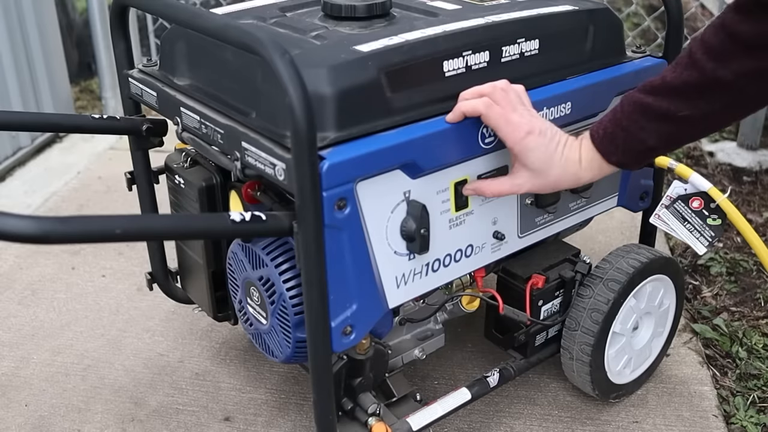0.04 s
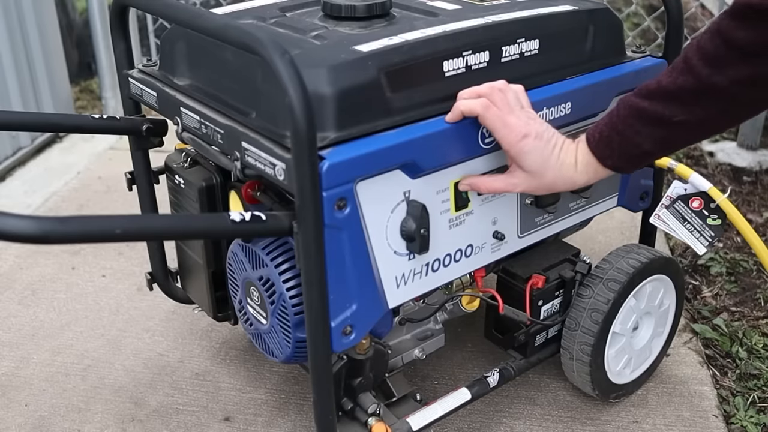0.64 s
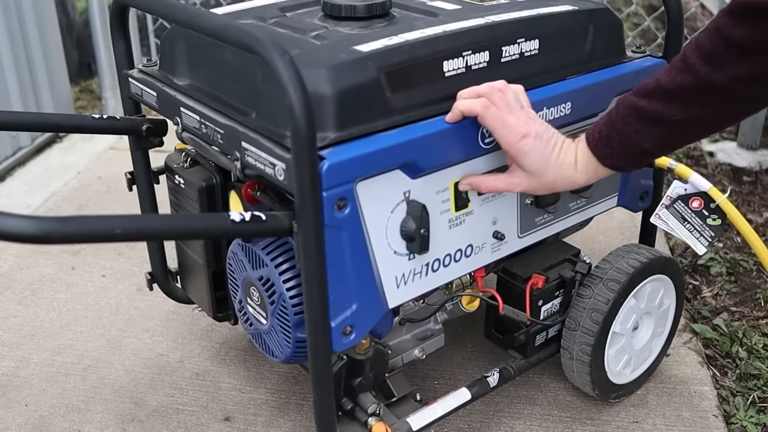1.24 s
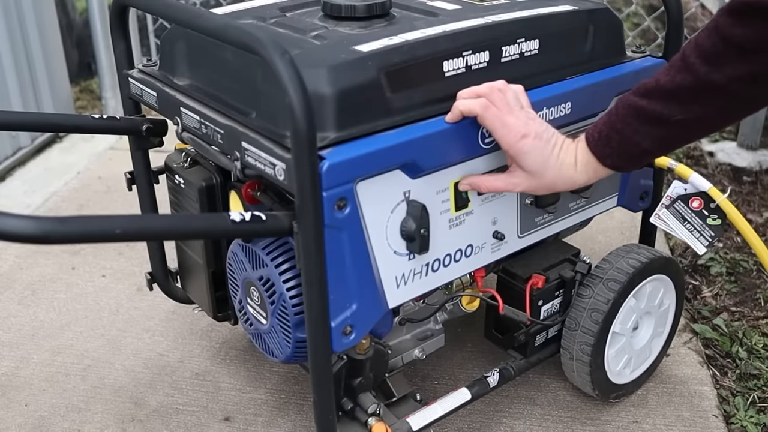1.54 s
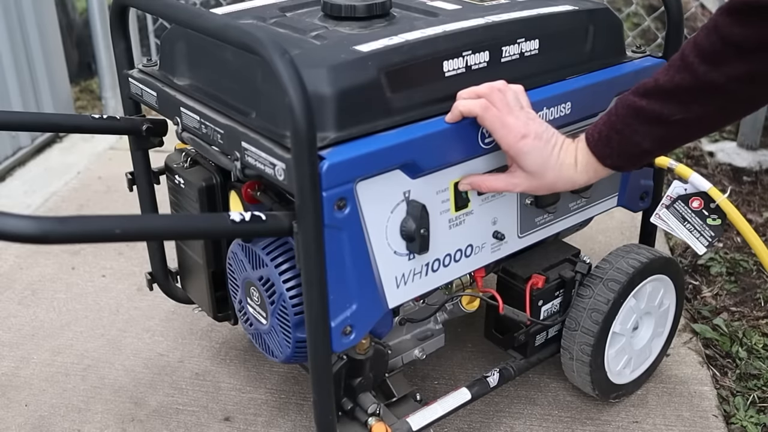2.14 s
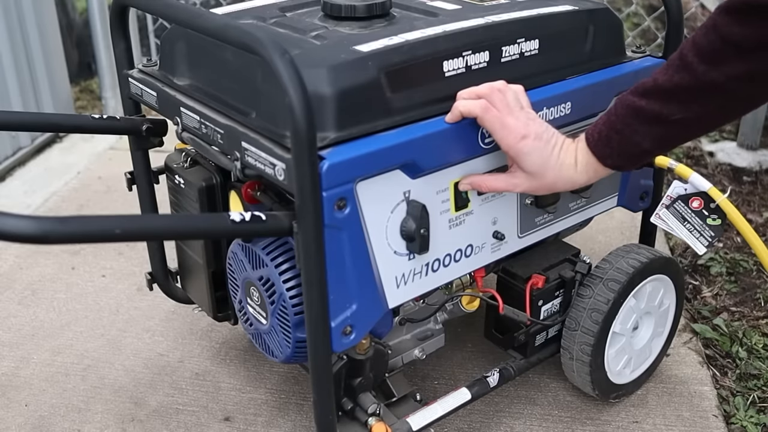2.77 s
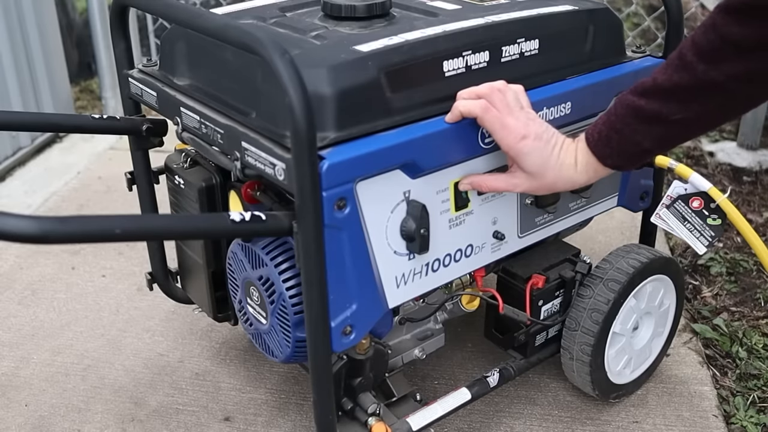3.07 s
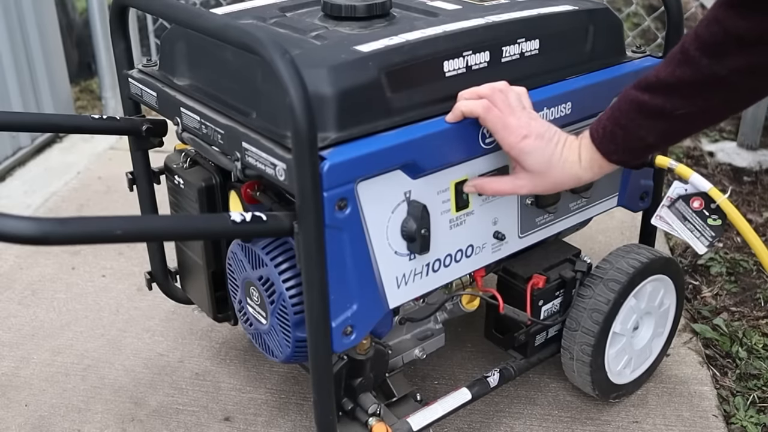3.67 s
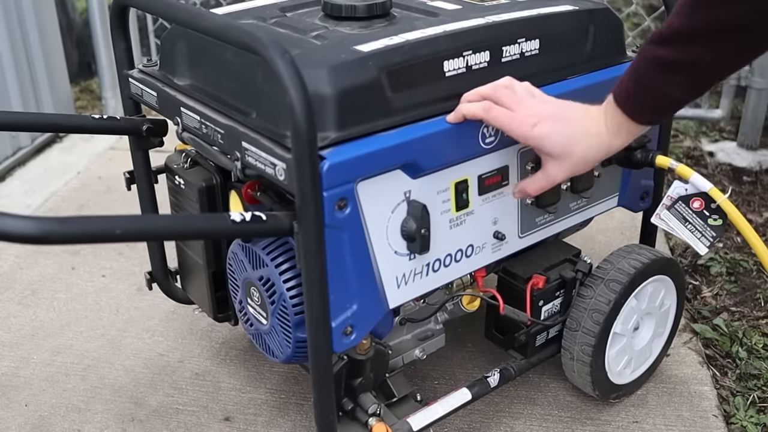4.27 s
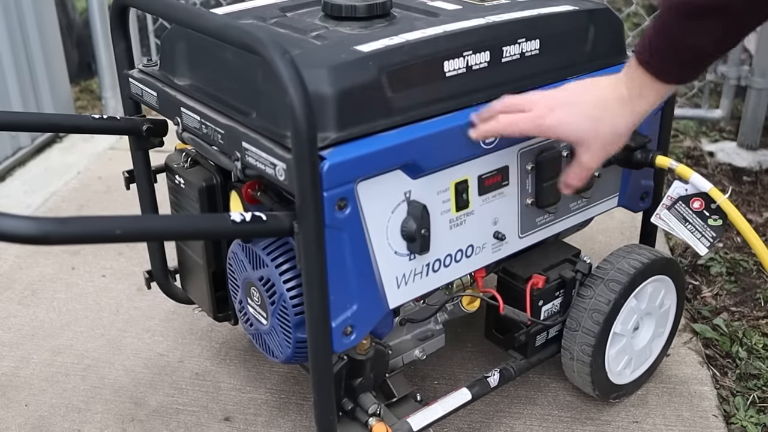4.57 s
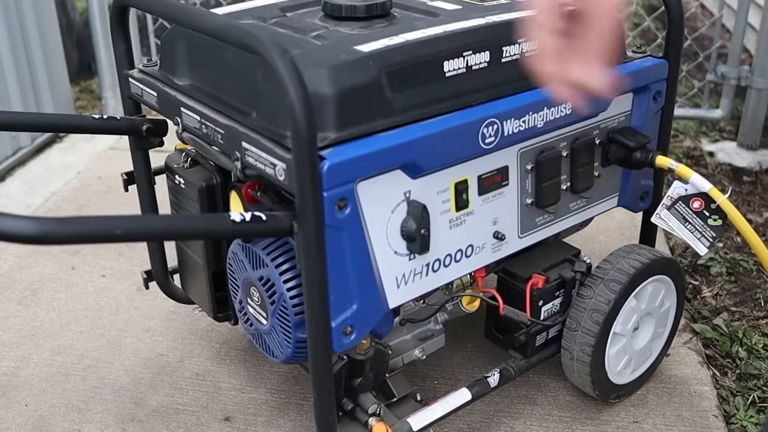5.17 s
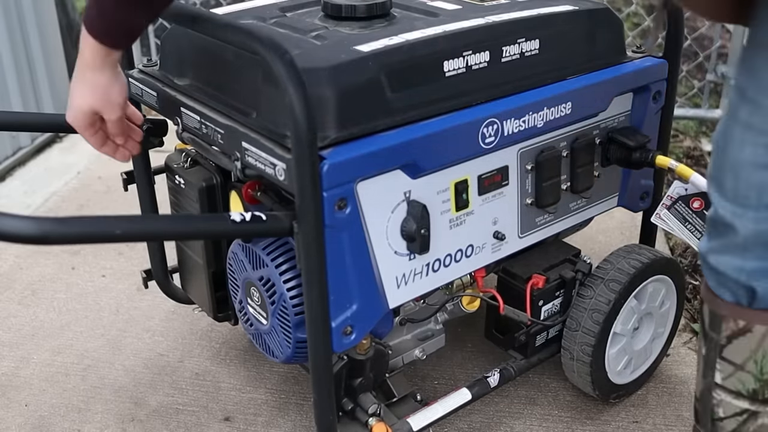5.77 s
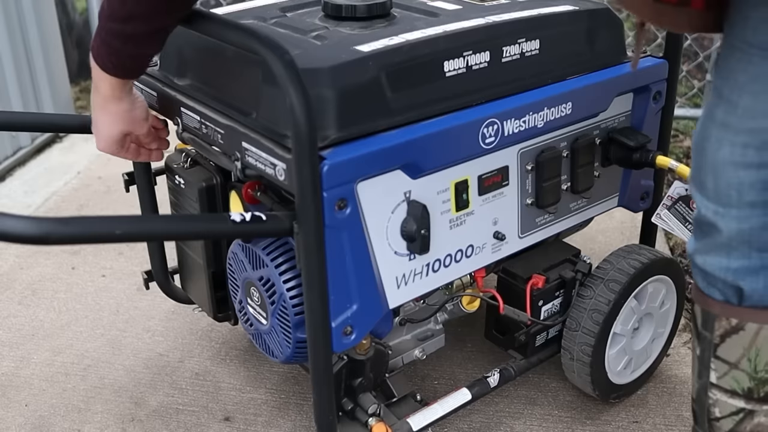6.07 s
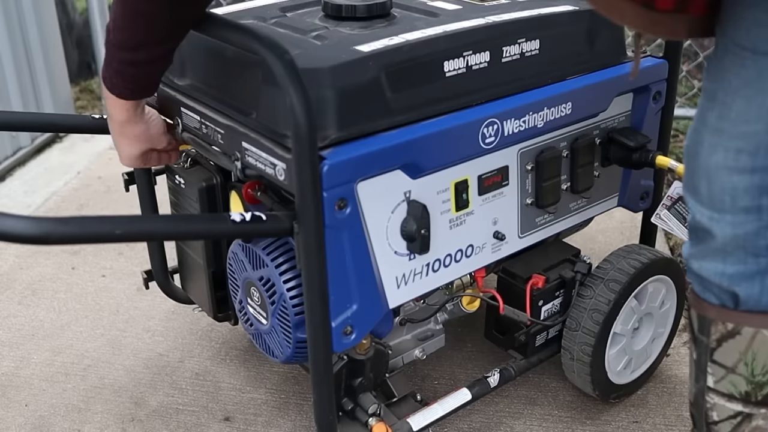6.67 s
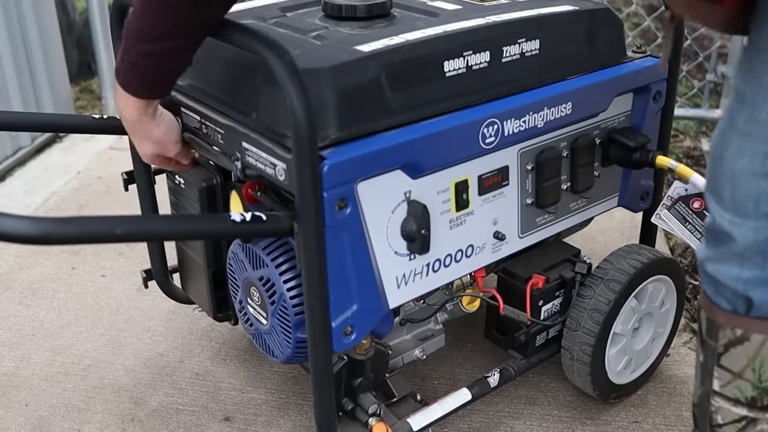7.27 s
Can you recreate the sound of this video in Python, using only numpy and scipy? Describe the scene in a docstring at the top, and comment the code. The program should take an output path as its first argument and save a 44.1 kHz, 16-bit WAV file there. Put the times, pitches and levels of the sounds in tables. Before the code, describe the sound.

A small petrol generator starts up outdoors over very faint background air. A rocker switch clicks lightly at about 0.1 seconds, and at 0.35 seconds the electric starter engages with a sharp metallic clack and a shudder of the frame. From 0.5 seconds the starter cranks with ringing, grinding gears and a wavering motor whine, falling into even surges about four times a second. At about 3.1 seconds it drops out and the engine catches with a few irregular cracks. From 3.6 seconds the engine races up, with exhaust pulses, rattling knocks and hiss, peaking near 4.4 seconds. The speed dips briefly, then settles by 5 seconds into a steady, throbbing drone with mechanical clatter. Around 6.7 seconds the tone becomes a little less boomy and a light whine joins in. The engine is still running at the end, a little after 7 seconds.

```python
"""Petrol generator starting outdoors.

A switch clicks, the starter pinion slams in and its gears grind one cylinder over each compression.
The engine catches with a few cracks, races up and settles at governed speed: two gas pulses a cycle
ring the pipes, knocks rattle the block, the exhaust valve hisses. Faint air lies behind."""
import sys
import numpy as np
from scipy import signal
from scipy.fft import rfft, irfft
from scipy.io import wavfile
from scipy.ndimage import uniform_filter1d

SR = 44100
rng = np.random.default_rng(int(sys.argv[2]) if len(sys.argv) > 2 else 0)


def master_out(mix):
    """Clip the mix to full scale and print it as 16-bit PCM to the path in sys.argv[1]."""
    frames = np.transpose(np.atleast_2d(mix))
    ceiling = np.clip(frames, -1, 1)
    pcm = np.round(ceiling * 32767).astype(np.int16)
    wavfile.write(sys.argv[1], SR, pcm)


N = 322812
TIME_S = np.arange(N) / SR
FREQ_HZ = np.maximum(np.arange(N // 2 + 1) * SR / N, 1)

# engine speed, two shaft turns a cycle: t/s, cycle rate/Hz
ENGINE_SPEED = [(3.1, 6.2), (3.3, 8.7), (3.55, 9.16), (3.7, 15.9), (3.79, 18.9), (3.86, 21.2), (4.0, 24.9),
                (4.2, 29.3), (4.39, 31.7), (4.7, 29.7), (5.0, 31.0), (5.4, 30.5), (5.92, 30.8),
                (6.68, 30.5), (7.05, 31.9), (7.32, 31.4)]
# throttle shuts on the overshoot, hunts, eases as the choke opens: t/s, opening/1
THROTTLE_TRAVEL = [(4.34, 0.96), (4.46, .04), (4.6, 0.24), (4.76, 0.6), (5.03, 0.34), (5.6, 0.51),
                   (6.84, 0.63), (7.06, 0.24)]
# valve, piston and gear knocks: phase/cycles, level/dB
KNOCKS = [(0.051, -9), (0.191, -4), (.3, -5), (0.431, -1), (.55, -5.5), (.67, -7), (.8, -1), (0.923, -6)]
# whine with the choke open: f/cycle rate, level/dB
WHINE_ORDERS = [(14, -15), (36, -11.5), (40, -10.5)]
# gear mesh: phase past compression/cycles, tooth rate/Hz
MESH_RATE = [(-.5, 880), (-.25, 810), (-.05, 715), (.15, 670), (.3, 640), (.42, 850)]
# pinion slamming in; pinion dropping out and first firings: t/s, level/dB, t60/s, tilt/(dB/octave)
PINION_BLOWS = [(.342, -31, 0.077, 8), (.351, -10.5, 0.1, 3.5), (.357, -8, 0.064, 5.5),
                (.364, -1, 0.095, 3), (.369, -11, 0.073, 4), (.380, -22.5, 1, -2.5)]
CATCH_BLOWS = [(3.203, -19, 0.078, 1), (3.385, -20, 0.21, 5), (3.505, -20.5, 0.45, 6),
               (3.604, -11, 0.15, -0.5), (3.62, -15.5, 0.22, 6.5), (3.676, -17, 0.2, -2),
               (3.693, -17.5, 0.092, 8), (3.745, -14, 0.14, 3)]
# frame jolts as the pinion hits and takes load: t/s, level/dB, attack/s, decay/s
FRAME_JOLTS = [(.37, -20.5, 0.016, .05), (.5, -20.5, 0.074, 0.096)]
# switch pressed, then snapping over: t/s, level/dB
SWITCH_CLICKS = [(0.12, -26), (.158, -32.5)]
# resonances of pipes, block, gear housing and rocker: f/Hz, width/Hz, level/dB
PIPE_MODES = [(67, 41, -15), (216.6, 45.2, 4), (329.3, 31.5, 0)]
BLOCK_MODES = [(727, 120, 6), (2108, 32, 10.5), (5650, 80, -44)]
HOUSING_MODES = [(660, 55, -12.5), (1477, 28, 3.5), (1754, 44, 4.5), (2020, 77, 5), (2377, 21, 6.5),
                 (2533, 10, 8), (3030, 27, -32), (3357, 27, 7), (3636, 58, 5.5), (4170, 130, -4.5),
                 (4546, 53, -3), (5340, 32, -3), (5430, 77, -10.5), (6460, 17, -13), (7840, 34, -10.5),
                 (9240, 65, -10.5), (9700, 20, -7.5), (10930, 54, -20)]
ROCKER_MODES = [(694, 40, -2), (2820, 110, -2), (3270, 90, -4), (3980, 220, -3)]
# engine spectra: f/Hz, level/dB
RUMBLE_SPECTRUM = [(20, -29), (60, 1), (130, -4), (220, 4.5), (330, -5.5), (480, -13.5), (1200, -31)]
BLOCK_SPECTRUM = [(250, -28), (420, -2.5), (482, -5), (566, -8), (728, -4), (855, -2.5), (1110, -4),
                  (1280, -6), (1480, -8), (2110, -3), (3580, -7), (4720, -20.5), (5290, -19), (5930, -31.5),
                  (6500, -25.5), (8450, -33.5), (14300, -120)]
FRAME_SPECTRUM = [(250, -17), (400, -4), (490, -10.5), (600, -2.5), (1100, 1), (2000, -4.5), (3500, -9.5),
                  (8000, -43)]
HISS_SPECTRUM = [(2940, -24.5), (5000, -12), (5420, 2), (6010, -11.5), (8420, 1), (11700, -6), (15500, -18)]
# spectra of gear scrape, blows and frame shudder: f/Hz, level/dB
SCRAPE_SPECTRUM = [(180, -54), (300, -43), (476, -21), (581, -17), (708, -2), (1260, -5.5), (1490, -0.5),
                   (1640, -2.5), (2170, -9), (2320, -2.5), (2650, -0.5), (3690, -1), (5950, -15),
                   (9450, -16), (15500, -33)]
BLOW_SPECTRUM = [(59, -53), (100, -30), (535, -9), (607, 3), (923, 7.5), (1530, -1), (1730, 7.5),
                 (3180, -4), (3760, -1), (4730, -13), (5370, -13), (6220, -18.5), (15000, -32.5)]
SHUDDER_SPECTRUM = [(30, -35), (130, -22), (200, -14.5), (250, 0.5), (340, -8.5), (520, -4.5), (750, 1),
                    (2000, -67)]
# outdoor air spectrum: f/Hz, level/dB
AIR_SPECTRUM = [(18, -46), (30, -2), (195, 2), (281, -3), (524, -6), (1000, -4.5), (2190, -15),
                (3500, -10.5), (4420, -19), (15000, -43)]

ENGAGE_S, SPIN_UP_S, BITE_S, STRAIN_S = .36, .08, .513, .76
COMPRESSION_S, CRANK_PERIOD_S, RELEASE_S, RUN_DOWN_S = 1.075, .2525, 3.09, .078
FIRING_S, SETTLE_S, HUNT_S, CHOKE_S = 3.57, 4.18, 4.76, 6.72
GOVERNED_HZ, PINION_HZ, MOTOR_WHINE_HZ = 30.7, 56, 1482


def engine():
    """Speed and throttle curves drive pipes and machinery; the unbalanced shaft hums once a turn."""
    cycle_hz, throttle = curve(ENGINE_SPEED), curve(THROTTLE_TRAVEL)
    cycle = np.cumsum(cycle_hz * (TIME_S >= ENGINE_SPEED[0][0])) / SR
    speed = cycle_hz / GOVERNED_HZ
    shaft = undb(-43) * speed ** 2 * np.sin(2 * np.pi * 2 * cycle)
    return (pipes(cycle, speed, throttle) + machinery(cycle, throttle) + shaft) * ramp(3.06, 3.12)


def stages():
    """Weights 0-1 of the stages of the start."""
    catching = 1 - ramp(RELEASE_S, FIRING_S)
    firing = ramp(FIRING_S, FIRING_S + .06)
    run_up = 1 - ramp(SETTLE_S, SETTLE_S + .29)
    choke_open = ramp(CHOKE_S, CHOKE_S + .19)
    return catching, firing, run_up, choke_open


def pipes(cycle, speed, throttle):
    """Exhaust and intake pulses ring the pipes over a rumble; an open throttle gulps deeply."""
    catching, firing, run_up, choke_open = stages()
    gulping = np.maximum(run_up, bell(TIME_S - HUNT_S, .14))
    lead_cycles = .36 - .04 * gulping
    intake = pulses(cycle + .13, scatter_db=.5, jitter_s=.00005)
    exhaust = pulses(cycle + .13 + lead_cycles, scatter_db=.7, jitter_s=.00007)
    gas = ring(exhaust + undb(1.2 * gulping - 3.7 * choke_open) * intake, PIPE_MODES)
    gas = steady(signal.sosfilt(signal.butter(2, [40, 900], "bandpass", fs=SR, output="sos"), gas))
    gas *= undb(-22.5 + 8.5 * throttle + 5.5 * np.log2(speed))
    gulp = steady(ring(ring(intake, [(60.4, 40, 0)]), [(75, 75, 0)])) * undb(-44.5 + 14 * throttle)
    rumble_db = -31 + 4 * throttle + 3.5 * run_up - 21.5 * np.sqrt(catching)
    sound = (gas + gulp) * firing + colour(noise(), RUMBLE_SPECTRUM) * undb(rumble_db)
    boom = ring(sound, [(94, 40, 0)])
    return sound - choke_open * boom


def machinery(cycle, throttle):
    """Knocks rattle the block and echo in the frame, with fan roar, blade tone, whine and valve hiss."""
    catching, firing, run_up, choke_open = stages()
    knocks = sum(undb(db) * pulses(cycle - phase, scatter_db=1.2, jitter_s=.00007) for phase, db in KNOCKS)
    knock_gain = 1 - .7 * catching
    rattle = steady(bursts(knocks, t60_s=.048))
    roar = unit_rms(noise() + .8 * rattle * knock_gain)
    block = undb(-.5) * colour(roar, BLOCK_SPECTRUM) + undb(-10) * unit_rms(ring(roar, BLOCK_MODES))
    frame = undb(-4) * knock_gain * frame_echo(knocks)
    fan = undb(-13 + 2.5 * wander(4)) * np.sin(2 * np.pi * 16 * cycle)
    fan *= (1 - run_up) * (1 - .6 * choke_open)
    whine = sum(undb(db + 2 * wander(20)) * np.sin(2 * np.pi * k * cycle) for k, db in WHINE_ORDERS)
    level_db = -22 + 1.46 * throttle + 2 * run_up + .74 * choke_open - 4 * (1 - firing) - 2.5 * catching
    clatter = (block + frame + fan + whine * choke_open) * undb(level_db)
    return clatter + valve_hiss(cycle, throttle, roar)


def frame_echo(knocks, decay_s=.014):
    """The frame answers every knock with the same short echo."""
    response = rng.standard_normal(4096) * np.exp(-TIME_S[:4096] / decay_s)
    return steady(colour(signal.fftconvolve(knocks, response)[:N], FRAME_SPECTRUM))


def valve_hiss(cycle, throttle, roar):
    """Each opening of the exhaust valve spits gas, fiercest in the run-up."""
    catching, firing, run_up, _ = stages()
    age_cycles = (cycle + .6) % 1
    fall_db = (2.4 + 8 * run_up * firing) * (.3 - age_cycles ** 2)
    tick_db = 4 * np.exp(-age_cycles / .1)
    spit = unit_rms(roar + .6 * noise()) * undb(fall_db + tick_db + .7 * wander(60))
    level_db = -40 + 2.5 * throttle + 3.5 * run_up - (1 - firing) - 5.4 * catching
    return colour(spit, HISS_SPECTRUM) * undb(level_db)


def starter():
    """Gear teeth hammer the housing; they slow into each compression and go slack at its top."""
    cycle = crank_cycle()
    past_cycles = (cycle + .5) % 1 - .5  # from the nearest compression
    spin = 1 - np.exp(-np.maximum(TIME_S - ENGAGE_S, 0) / SPIN_UP_S)
    strain = bell(TIME_S - STRAIN_S, .23)
    swing = ramp(.8, 1)  # compressions tell once the flywheel turns
    push = bell(past_cycles + .11, .084) * swing
    slack = bell(past_cycles, .04) * swing

    early_hz = 640 + 70 * ramp(.55, .85)
    cranking_hz = np.interp(past_cycles, *np.transpose(MESH_RATE), period=1)
    mesh_hz = spin * (early_hz * (1 - swing) + cranking_hz * swing) * (1 + .016 * wander(60))
    teeth = pulses(np.cumsum(mesh_hz) / SR, scatter_db=1.5, jitter_s=.00008)
    pinion_rad = phase_rad(PINION_HZ * spin * (1 + .015 * wander(11)))
    bite_db = .8 * np.cos(pinion_rad) + .5 * wander(90)  # off-centre pinion
    grit = unit_rms(bursts(teeth, t60_s=.0059))
    drive = unit_rms(teeth) + 1.36 * grit

    metal = undb(-1.5) * steady(ring(drive, HOUSING_MODES), window_samples=1200)
    scrape = undb(-2.5) * colour(grit, SCRAPE_SPECTRUM)
    high_ring = steady(ring(drive, [(2965, 9.3, 2), (3692, 25, 0)]), window_samples=1200)
    high_ring *= undb(-16 + 13 * strain + 11.6 * push)
    whine = motor_whine(cycle, past_cycles)
    over_top = 1.1 * bell(past_cycles + .075, .05) + .5 * bell(past_cycles - .07, .05)
    effort = .1 + over_top * swing + .33 * (1 - swing)
    groan = undb(-8 + 2.2 * wander(90)) * np.sin(phase_rad(mesh_hz)) * effort

    loose = 1 - ramp(BITE_S - .11, BITE_S)
    level_db = -17 + bite_db + .85 * push - 4.3 * slack + 2 * strain - 21 * loose
    engaged = (TIME_S > ENGAGE_S) * (1 - ramp(RELEASE_S, RELEASE_S + RUN_DOWN_S))
    return (metal + scrape + high_ring + whine + groan) * undb(level_db) * engaged


def motor_whine(cycle, past_cycles):
    """The starter motor's whine wavers with the load and sags under each compression."""
    angle_rad = phase_rad(MOTOR_WHINE_HZ * (1 - .012 * np.sin(2 * np.pi * cycle) + .0057 * wander(120)))
    tone = undb(-6.5) * np.sin(angle_rad) + undb(-27) * np.sin(2 * angle_rad)
    return tone * ramp(ENGAGE_S, .81) * (1 - .74 * bell(past_cycles + .026, .095))


def crank_cycle():
    """Engine cycles under the starter; whole numbers are compressions."""
    return (TIME_S - COMPRESSION_S) / CRANK_PERIOD_S


def blows(table, housing_db):
    """Sharp blows crack through the frame and ring the housing."""
    cracks = sum(undb(db) * colour(noise() * decay(start_s, t60_s), BLOW_SPECTRUM, tilt)
                 for start_s, db, t60_s, tilt in table)
    return cracks + undb(housing_db) * ring(cracks, HOUSING_MODES)


def shudder():
    """The frame jolts, then shakes while the unfired cylinder puffs once a shaft turn."""
    cranking = (TIME_S > .38) * (1 - ramp(RELEASE_S, RELEASE_S + 3 * RUN_DOWN_S))
    jolts = sum(undb(db) * ramp(at_s - attack_s, at_s) * np.exp(-np.maximum(TIME_S - at_s, 0) / decay_s)
                for at_s, db, attack_s, decay_s in FRAME_JOLTS)
    strokes = pulses(2 * crank_cycle() + .45, scatter_db=2, jitter_s=.00285)
    puffs = undb(-48.5) * unit_rms(ring(strokes, [(70, 100, -11), (200, 69, -5)]))
    rumble = undb(-50) * colour(noise(), RUMBLE_SPECTRUM, tilt_db_per_octave=-1.5)
    shake = colour(noise(), SHUDDER_SPECTRUM) * (jolts + undb(-40) * cranking)
    return shake + (puffs + rumble) * cranking


def switch():
    """Dry ticks ring the plastic rocker."""
    snap = noise() * sum(undb(db) * decay(start_s, t60_s=.1) for start_s, db in SWITCH_CLICKS)
    rocker = unit_rms(ring(snap, ROCKER_MODES)) * np.std(snap)
    return rocker + undb(-1) * colour(snap, BLOW_SPECTRUM, tilt_db_per_octave=7)


def outdoor_air():
    """Faint low noise, drifting in level."""
    return colour(noise(), AIR_SPECTRUM) * undb(-50 + wander(3.3))


def undb(db):
    """Decibels to gain."""
    return 10 ** (np.asarray(db) / 20)


def unit_rms(x):
    """Scale to rms 1."""
    return x / np.sqrt(np.mean(x ** 2))


def curve(table):
    """Straight lines through rows of t/s, value."""
    return np.interp(TIME_S, *np.transpose(table))


def ramp(start_s, end_s):
    """Linear rise from 0 to 1."""
    return np.clip((TIME_S - start_s) / (end_s - start_s), 0, 1)


def bell(x, width):
    """Gaussian of height 1 at x = 0."""
    return np.exp(-(x / width) ** 2)


def decay(start_s, t60_s):
    """Step to 1, then exponential fall."""
    return (TIME_S >= start_s) * undb(-60 * np.clip((TIME_S - start_s) / t60_s, 0, 10))


def phase_rad(hz):
    """Running phase of a varying frequency."""
    return 2 * np.pi * np.cumsum(hz) / SR


def noise():
    """White noise."""
    return rng.standard_normal(N)


def wander(rate_hz):
    """Smooth random drift, rms 1."""
    step = int(SR / rate_hz)
    return unit_rms(uniform_filter1d(np.repeat(rng.standard_normal(N // step + 1), step), step)[:N])


def colour(x, spectrum, tilt_db_per_octave=0):
    """Minimum-phase filter through rows of f/Hz, level/dB; keeps the power of white noise."""
    hz, db = np.transpose(spectrum)
    tilt_db = tilt_db_per_octave * np.log2(np.maximum(FREQ_HZ, hz[0]))
    gain = unit_rms(undb(np.interp(np.log(FREQ_HZ), np.log(hz), db) + tilt_db))
    cepstrum = irfft(np.log(gain), N)
    causal_fold = np.r_[1, np.full(N // 2 - 1, 2), np.zeros(N - N // 2)]
    return irfft(rfft(x) * np.exp(rfft(cepstrum * causal_fold)), N)


def ring(x, modes):
    """Resonances of alternating sign; rows of f/Hz, width/Hz, level/dB."""
    response = sum((-1) ** k * undb(db) / (1 + 1j * (FREQ_HZ ** 2 - hz ** 2) / (FREQ_HZ * width_hz))
                   for k, (hz, width_hz, db) in enumerate(modes))
    return irfft(rfft(x) * response, N)


def pulses(phase_cycles, scatter_db, jitter_s):
    """One pulse per whole cycle, scattered in size and time."""
    onsets = np.flatnonzero(np.diff(np.floor(np.maximum.accumulate(phase_cycles))) > 0)
    size, slip = rng.standard_normal((len(onsets), 2)).T
    onsets += np.round(slip * jitter_s * SR).astype(int)
    return np.bincount(np.clip(onsets, 0, N - 1), undb(scatter_db * size), N)


def bursts(hits, t60_s):
    """Noise dying away after each hit."""
    pole = np.exp(-2 * np.log(1000) / (t60_s * SR))
    return noise() * np.sqrt(signal.lfilter([1], [1, -pole], hits ** 2 + 1e-18))


def steady(x, window_samples=6000):
    """Even out slow level changes to rms near 1."""
    power = np.maximum(uniform_filter1d(x ** 2, window_samples), 0)
    return x / np.sqrt(power + np.mean(power) / 100)


def scene():
    """Switch, cranking and engine over outdoor air; mono."""
    air = outdoor_air()
    start = switch() + blows(PINION_BLOWS, housing_db=-20) + starter() + shudder()
    run = blows(CATCH_BLOWS, housing_db=-25) + engine()
    return (start + run + air)[None]


def record(dry):
    """Clip at full scale, then low-pass steeply."""
    return signal.sosfilt(signal.ellip(14, .2, 80, 15550, fs=SR, output="sos"), np.clip(dry, -1, 1))


dry = scene()
out = record(dry)
master_out(out)
```